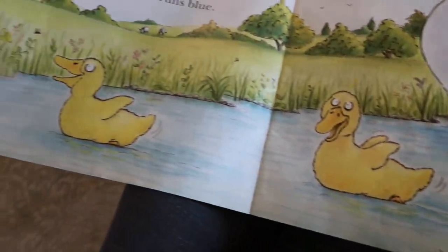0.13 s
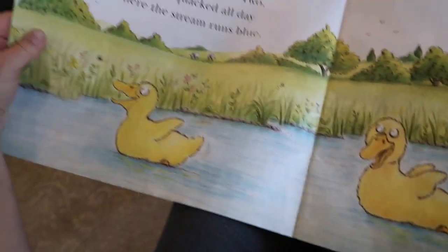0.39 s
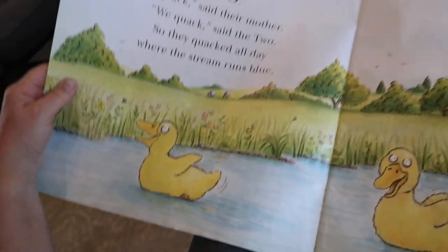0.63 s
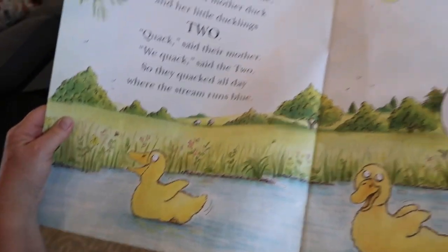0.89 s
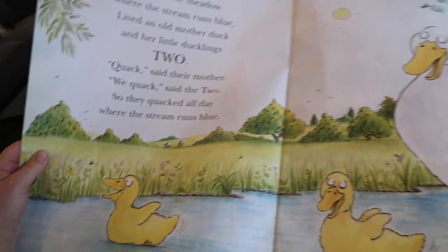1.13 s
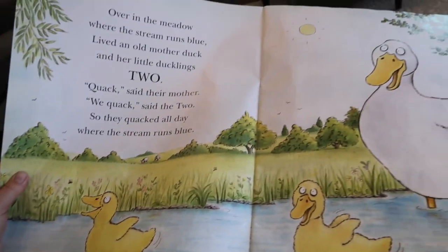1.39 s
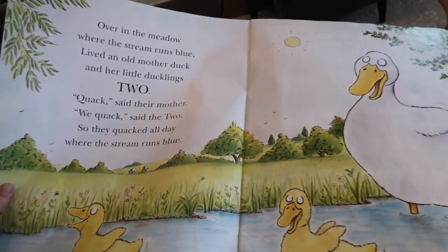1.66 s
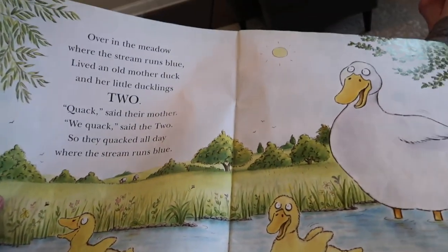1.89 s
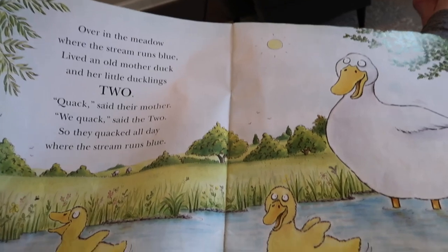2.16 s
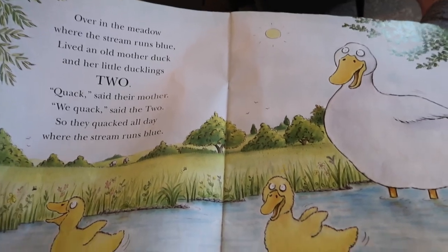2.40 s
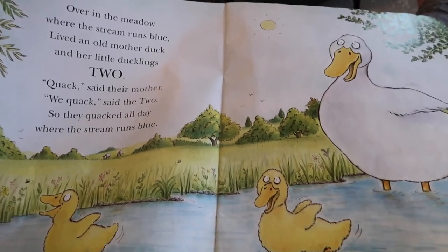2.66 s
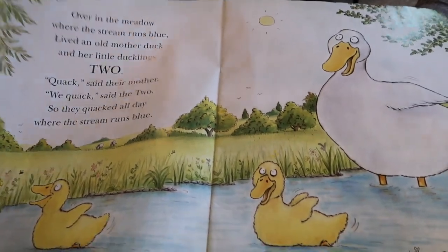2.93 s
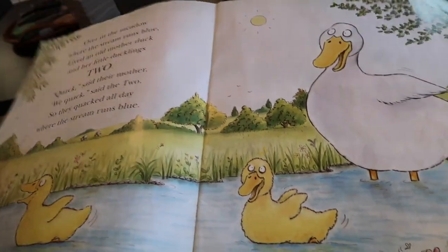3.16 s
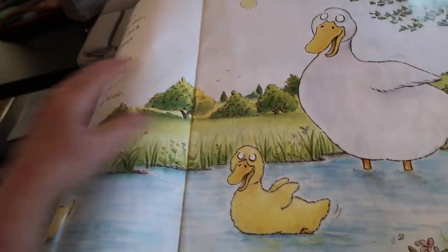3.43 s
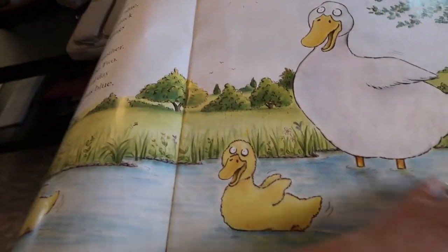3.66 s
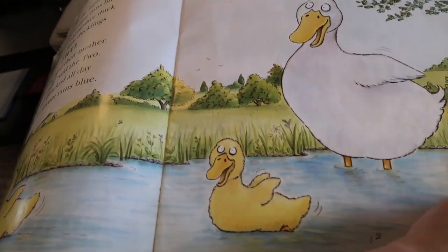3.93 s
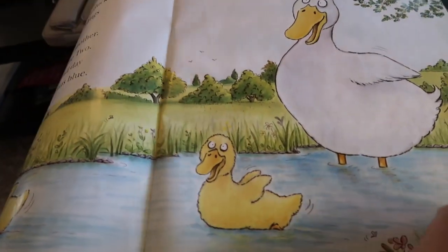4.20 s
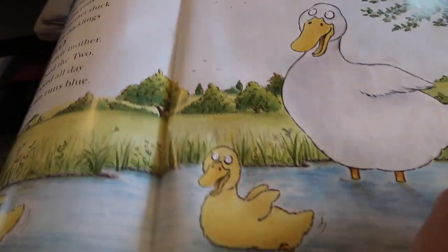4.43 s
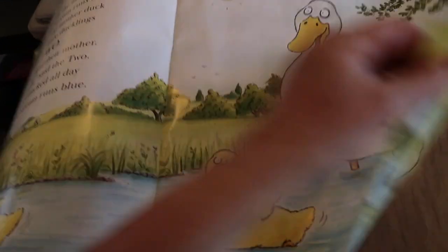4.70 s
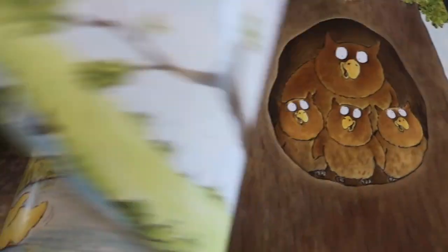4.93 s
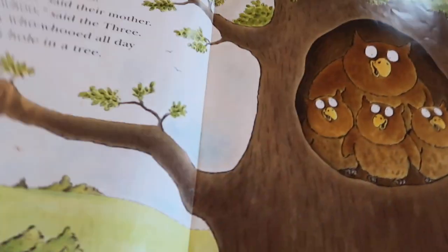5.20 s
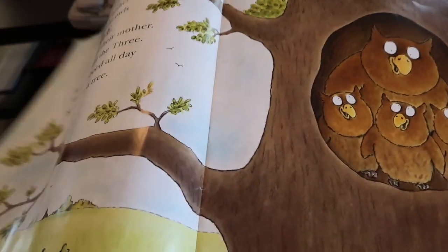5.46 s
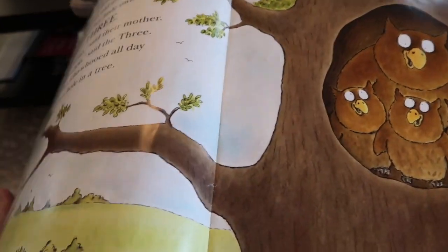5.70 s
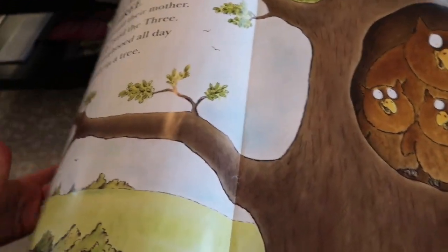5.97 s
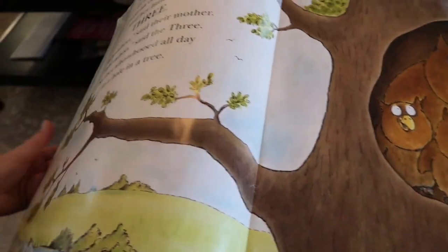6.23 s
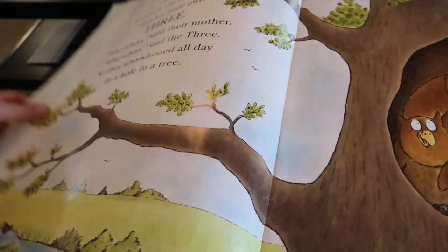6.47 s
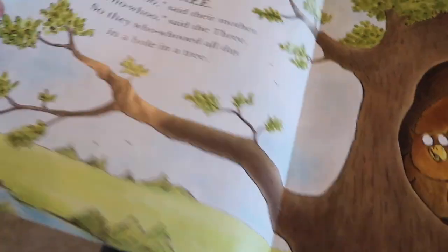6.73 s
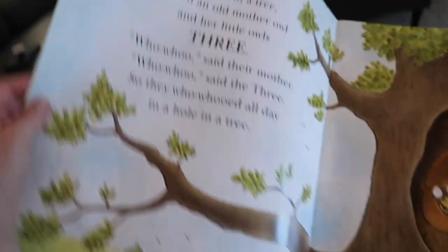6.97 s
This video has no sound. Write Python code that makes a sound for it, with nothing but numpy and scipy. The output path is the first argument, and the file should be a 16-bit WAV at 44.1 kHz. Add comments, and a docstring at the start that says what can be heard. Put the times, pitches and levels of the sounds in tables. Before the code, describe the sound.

Close to the microphone, a large glossy book shifts with a brief crackle and soft thump, then rests in a quiet rumbling room. A distant bird chirps faintly. The sheet buckles with a hollow pop, fingers slide and scrape along it, and the page turns in a burst of flapping and snapping. After a lull, light handling and a low thud close the scene.

```python
"""A large glossy picture book on a lap, close to a camera in a quiet room, while one page is turned.
From the start there is a rumble, hiss and a thin whistle (shaped noise, a sine), with focus-motor pings.
From about 0.15 s the sheet flaps and scrapes (swept noise) under sliding skin, snaps (ringing modes),
and the book thumps softly (fading sines). A far bird warbles (gliding sines) from 1.7 s; the book is
handled again at about 2.9 s, 3.7 to 5.9 s and from 6.6 s to the end."""
import sys
import numpy as np
from scipy import signal
from scipy.fft import rfft, irfft, next_fast_len
from scipy.io import wavfile
from scipy.ndimage import uniform_filter1d, map_coordinates

SR = 44100
rng = np.random.default_rng(int(sys.argv[2]) if len(sys.argv) > 2 else 0)


def volts_from_decibels(level):
    """Turn decibel levels (scalar or array-like) into linear amplitude factors."""
    exponent = np.asarray(level, float) / 20
    return 10 ** exponent


def digitize_waveform(pressure):
    """Quantize a signal to 16-bit integers and store it at the path in sys.argv[1].

    Rows of a 2-D input are taken as channels; values are limited to [-1, 1].
    """
    field = np.atleast_2d(pressure).T
    bounded = np.clip(field, -1, 1)
    quanta = np.round(bounded * 32767).astype(np.int16)
    wavfile.write(sys.argv[1], SR, quanta)


N = 313286

# the sheet buckles or is tapped; levels are those of the loudest millisecond:
# [start_s, body_db, body_pitch_hz, crack_db, tick_db]
BUCKLES = [(0.219, -63, 248, -49, -56), (0.2258, -36, 250, -46, -50), (0.246, -35, 272, -39.5, -51),
           (0.272, -45, 262, -41, -46), (0.2755, -27.5, 260, -24.5, -42), (0.287, -41, 250, -42, -62),
           (0.298, -36, 300, -55, -60), (0.3322, -31, 263, -31.5, -47), (2.866, -36, 395, -42, -59),
           (2.964, -36, 433, -43, -54), (2.973, -57, 430, -40.5, -45), (2.98, -41, 241, -42, -56),
           (3.031, -23, 533, -29, -43), (3.035, -16.5, 324, -37, -60), (3.0385, -13, 301, -29, -68),
           (3.045, -24.5, 564, -37, -46), (3.071, -42, 450, -40, -61), (3.095, -32, 790, -52, -62),
           (3.198, -45, 257, -52, -50), (3.219, -44, 815, -55, -52), (3.277, -47, 290, -48, -46),
           (3.75, -40, 450, -70, -54), (4.142, -41.5, 566, -66, -54), (4.199, -54, 510, -49, -54),
           (4.232, -31, 330, -40, -48), (4.289, -33.5, 417, -52, -53), (4.305, -54, 840, -25.5, -54),
           (4.3075, -32, 850, -32, -52), (4.391, -39, 910, -37, -57), (4.4537, -28.5, 515, -18.5, -32),
           (4.469, -38, 253, -42, -42), (4.479, -38, 854, -26.5, -38), (4.492, -41, 730, -33, -51),
           (4.519, -32, 504, -35, -42), (4.547, -39, 505, -42, -54), (4.567, -55, 400, -37, -53),
           (4.583, -57, 999, -35, -51), (4.607, -52, 617, -24, -40), (4.951, -36, 407, -52, -64),
           (4.994, -28, 484, -29.5, -46), (4.998, -26, 593, -35, -50), (5.01, -49, 500, -51, -49),
           (5.034, -19.5, 423, -25, -59), (5.037, -21, 500, -30, -54), (5.042, -28, 423, -40, -60),
           (5.054, -23.5, 393, -33, -53), (5.064, -35, 520, -50, -58), (5.073, -28, 424, -50, -54),
           (5.088, -32, 445, -50, -60), (5.102, -29, 540, -50, -58), (5.119, -25.5, 605, -19.5, -39.5),
           (5.131, -23.5, 910, -47, -57), (5.14, -27, 580, -52, -62), (5.148, -43, 403, -53, -63),
           (5.173, -24.5, 890, -35, -55), (5.184, -35, 690, -46, -64), (5.25, -34.5, 550, -54, -62),
           (5.266, -30.5, 704, -52, -56), (5.439, -27.5, 284, -26, -32), (5.447, -28.5, 330, -32.5, -59),
           (5.455, -32, 600, -38, -50), (5.463, -31, 686, -40, -54), (5.473, -39, 500, -52, -56),
           (5.4995, -30.5, 1050, -27, -42), (5.507, -34, 635, -47, -60), (6.667, -42, 710, -62, -60),
           (6.72, -47, 715, -64, -57), (6.857, -40, 540, -59, -60), (6.8625, -30.5, 380, -49, -51),
           (6.869, -39, 560, -47, -54), (6.877, -23.5, 283, -54, -58), (6.896, -37, 300, -65, -64),
           (6.9655, -35.5, 795, -42, -62), (6.987, -40.5, 593, -50, -61), (6.997, -47, 560, -60, -64),
           (7.006, -38.5, 690, -56, -63), (7.019, -47, 690, -49, -59), (7.029, -44, 700, -57, -63),
           (7.038, -46, 700, -56, -63), (7.072, -43, 560, -58, -57), (7.081, -45, 545, -64, -64),
           (7.091, -40, 557, -58, -64)]


def unit(x):
    """Scale to an average (rms) level of 1."""
    return x / np.sqrt(np.mean(x ** 2) + 1e-20)


def along(points, hz):
    """Read a curve of (Hz, value) points on a logarithmic pitch axis."""
    f, v = np.transpose(points)
    return np.interp(np.log(hz + 1), np.log(f + 1), v)


def curve(rows):
    """Turn (seconds, value) points into one value per sample."""
    return np.interp(np.arange(N) / SR, *np.transpose(rows))


def filtered(x, response):
    """Multiply the spectrum of x by a response that depends on frequency."""
    m = next_fast_len(x.shape[-1] + 8192)
    hz = np.fft.rfftfreq(m, 1 / SR)
    return irfft(rfft(x, m) * response(hz), m)[..., :x.shape[-1]]


def coloured(x, spectrum):
    """Shape x by a spectrum that falls silent beyond its ends, at rms 1."""
    below, above = (spectrum[0][0] / 2, -120), (spectrum[-1][0] * 2, -120)
    closed = [below] + list(spectrum) + [above]
    return unit(filtered(x, lambda hz: volts_from_decibels(along(closed, hz))))


def wobble(rate):
    """A smooth random curve with `rate` random points a second."""
    points = rng.standard_normal(int(N * rate / SR) + 4)
    return map_coordinates(points, [np.arange(N) * rate / SR])


def mode(f, hz, width):
    """Response of one resonance: strongest at hz, about `width` hertz wide."""
    return 1j * f * width / (hz * hz - f * f + 1j * f * width)


def swept(x, spectrum, hz, width, skirt_db):
    """Colour x and pass it through a resonance that follows hz; width is a share of that pitch."""
    f, t, z = signal.stft(x, SR, nperseg=512, noverlap=384)
    at = np.minimum((t * SR).astype(int), N - 1)
    centre = hz[at]
    gain = np.abs(mode(f[:, None], centre, width[at] * centre)) ** 2 + volts_from_decibels(skirt_db)
    # the level stays as the colour moves
    heard = gain * volts_from_decibels(along(spectrum, f))[:, None]
    gain /= np.sqrt(np.mean(heard ** 2, 0))
    moving = signal.istft(z * gain, SR, nperseg=512, noverlap=384)[1][:N]
    return coloured(moving, spectrum)


def panned(x, db, lag_us):
    """Mono to stereo: treble is shaded from port to port, and one port hears the sound first."""
    high = filtered(x, lambda f: f ** 2 / (f ** 2 + 1000 ** 2))
    pair = x - high + high * volts_from_decibels([db / 2, -db / 2])
    at = np.arange(N)
    half_lag = lag_us * 1e-6 * SR / 2  # in samples
    left = map_coordinates(pair[0], [at - half_lag], order=5)
    right = map_coordinates(pair[1], [at + half_lag], order=5)
    return np.array([left, right])


def tail(t60s):
    """Two noise echoes in which each frequency dies at its own speed; the first has energy 1."""
    hz, t, z = signal.stft(rng.standard_normal((2, SR // 2)), SR, nperseg=256)
    fade = volts_from_decibels(-60 * t / along(t60s, hz)[:, None])
    h = signal.istft(z * fade, SR, nperseg=256)[1]
    return h / np.linalg.norm(h[0])


def air():
    """Ventilation rumble partly shared by both ports, hiss less alike in them, and a steady thin whistle."""
    # colour of rumble and hiss: [pitch_hz, relative_db per hertz]
    noise_colour = [(12, -66), (20, -27), (49, -8), (90, -8.5), (153, -1.5), (180, -7), (259, -8),
                    (382, -14), (478, -14), (549, -17.5), (597, -16.5), (857, -20.5), (1870, -24),
                    (12700, -43), (15500, -28)]
    # how alike left and right are: [pitch_hz, likeness from -1 to 1]
    likeness = [(60, 1), (180, 0.87), (550, -0.13), (1650, 0.11), (4970, 0.38), (15000, -0.51)]
    # electronic whistle: pitch_hz, level_db (rms), left_lead_radians
    whistle_hz, whistle_db, left_lead = (13007, -84.3, 1.2)
    level_db = -49.5 + .4 * wobble(3)

    def shape(hz):
        return volts_from_decibels(along(noise_colour, hz)) / (1 + (hz / 13250) ** 120)  # hiss ends steeply

    def mid_and_side(hz):
        turn = np.arccos(np.clip(along(likeness, hz), -1, 1)) / 2
        return shape(hz) * np.array([np.cos(turn), np.sin(turn)])

    mid, side = filtered(rng.standard_normal((2, N)), mid_and_side)
    phase = 2 * np.pi * whistle_hz * np.arange(N) / SR + [[left_lead], [0]]
    whistle = np.sqrt(2) * volts_from_decibels(whistle_db) * np.sin(phase)
    return volts_from_decibels(level_db) * unit(np.array([mid + side, mid - side])) + whistle


def focus():
    """Each motor step pings the camera body and rebounds, pushing the two ports in opposite directions."""
    # the focus motor hunts: [start_s, end_s, steps_per_s, level_db before spread and port gains]
    runs = [(.015, .16, 29.97, -51), (.615, 1.06, 29.97, -55), (5.02, 5.6, 14.985, -55),
            (5.62, 6.1, 14.985, -52), (6.154, 6.43, 14.985, -58)]
    spread_db, rebound_db, rebound_s = 4, -2, .018
    out, t = np.zeros(N + SR), np.arange(SR // 80) / SR
    swell = np.exp(-.5 * ((t - .003) / .0016) ** 2)
    for start, end, rate, db in runs:
        for s in np.arange(start, end, 1 / rate):
            size, again, late = rng.standard_normal(size=3)
            step = (s, size * spread_db / 2)
            rebound = (s + rebound_s * np.exp(.4 * late), rebound_db + again * spread_db)
            for at, level in (step, rebound):
                ping = np.sin(2 * np.pi * rng.normal(4070, 30) * t)
                ping += 0.33 * np.sin(2 * np.pi * 3350 * t)
                out[round(at * SR):][:len(t)] += volts_from_decibels(db + level) * ping * swell
    return out[:N] * [[1.15], [-.85]]


def handling():
    """Flap and scrape levels follow the gestures and each snap; the slide swells with each stroke."""
    # the sheet in motion, one table a gesture, levels before flicker: [time_s, flap_db, scrape_db]
    gestures = [
        [(.15, -56, -66), (.2, -72, -63), (.227, -50, -48), (.24, -63, -69), (.294, -55, -56), (.4, -60, -59),
         (.55, -77, -90)],
        [(2.9, -74, -83), (2.992, -50, -60), (3.058, -46, -49), (3.124, -46.5, -49), (3.16, -47.5, -57),
         (3.21, -51.5, -53), (3.296, -57.5, -63), (3.45, -63, -69)],
        [(3.7, -77, -83), (3.79, -54.5, -83), (3.9, -79, -83)],
        [(4.1, -53, -68), (4.15, -54, -66), (4.21, -58, -55), (4.28, -51, -63), (4.312, -50, -42.5),
         (4.34, -48.5, -43.5), (4.35, -50, -48), (4.385, -54, -50), (4.405, -55, -47), (4.42, -55, -37.5),
         (4.44, -55, -37.5), (4.452, -48, -39), (4.47, -37.5, -50), (4.525, -45.5, -49), (4.58, -49, -57),
         (4.64, -46.5, -47.5), (4.706, -54.5, -61), (4.8, -52.5, -67)],
        [(4.8, -56, -66), (4.93, -51.5, -61), (4.985, -38.5, -55), (5.02, -36, -50), (5.06, -40.5, -46),
         (5.11, -35.5, -50), (5.14, -32, -48), (5.21, -38, -58), (5.266, -38.5, -62), (5.43, -51.5, -66)],
        [(5.43, -48, -54), (5.465, -40, -40), (5.49, -42, -50), (5.51, -37.5, -43.5), (5.55, -53, -49.5),
         (5.6, -53, -55.5), (5.738, -66, -58.5), (5.9, -71, -78)],
        [(6.6, -68, -70), (6.66, -59, -69), (6.705, -48.5, -63), (6.77, -58, -82), (6.85, -55.5, -74),
         (6.94, -52.5, -73), (6.99, -43, -58), (7.03, -45, -71), (7.05, -56, -67), (7.09, -47, -54)],
    ]
    # skin slides over the gloss: [middle_s, length_s, level_db before flicker]
    strokes = [(0.214, 0.17, -65), (3.03, 0.29, -58.5), (3.232, 0.24, -53.5), (3.82, 0.32, -66.5),
               (4.273, 0.26, -55.5), (4.5, 0.5, -52.5), (4.87, 0.47, -64.5), (4.984, 0.12, -69),
               (5.1, 0.11, -51), (5.438, 0.27, -68), (5.646, 0.44, -63.5), (6.65, 0.44, -60),
               (7.03, 0.73, -56)]
    shudder_db, shudder_t60_s = -18.5, 0.065  # level under the snap, and decay
    rest_hz, rest_db, hz_per_db = 330, -69, 4.5
    t = np.arange(N) / SR
    levels = np.zeros((3, N))  # flap, scrape, slide
    for rows in gestures:
        s, *dbs = np.transpose(rows)
        # silent outside its gesture, but the last one stays on to the end
        fade = np.clip(np.minimum(t - s[0], s[-1] - t) / .03 + .5 + (t > 7), 0, 1)
        levels[:2] += fade * volts_from_decibels([np.interp(t, s, d) for d in dbs])
    # after a snap the sheet flaps and scrapes on
    after = t[:SR // 3]
    shudder = volts_from_decibels(shudder_db - 60 * after / shudder_t60_s) * (1 - np.exp(-after / 0.00035))
    for s, db, _, crack_db, _ in BUCKLES:
        part = levels[:2, round(s * SR):][:, :len(after)]
        part += volts_from_decibels([[db], [crack_db]]) * shudder[:part.shape[1]]
    for s, length, db in strokes:
        levels[2] += volts_from_decibels(db) * np.cos(np.pi * np.clip((t - s) / length, -.5, .5)) ** 2
    # a harder flap stretches the sheet and rings higher
    effort_db = 20 * np.log10(levels[0] + 1e-6) - rest_db
    return levels, rest_hz + hz_per_db * np.clip(effort_db, 0, 18)


def crinkle(rate, share):
    """Friction: smooth noise plus clumped tiny slips of uneven size."""
    slips = (rng.random(N) < rate / SR * volts_from_decibels(3 * wobble(60))) * rng.standard_normal(N)
    share = np.clip(share, 0, 1)
    return np.sqrt(share) * unit(slips) + np.sqrt(1 - share) * rng.standard_normal(N)


def rustle(bend_hz, bend_width):
    """The sheet wobbles in the air, its edge scrapes, and skin slides on the gloss."""
    # three noise colours: [pitch_hz, relative_db per hertz]
    flap_colour = [(100, 11), (200, 2.5), (300, -6), (500, -6.5), (800, -5), (1300, -3), (2500, -8)]
    scrape_colour = [(400, -43), (900, 5), (1500, -1), (2200, 0.5), (3500, -5), (4300, -8), (5200, -24),
                     (8000, -35)]
    slide_colour = [(1500, 0.5), (3500, 2), (5000, -2.5), (8000, -9.5), (12000, -11), (14500, -19)]
    levels, flap_hz = handling()
    flap = swept(crinkle(250, share=0.29), flap_colour, flap_hz, width=np.full(N, 0.99), skirt_db=-22.5)
    flap *= volts_from_decibels(1.8 * wobble(60))
    scrape_hz = bend_hz * (1 + 0.054 * wobble(50))
    scrape = swept(crinkle(2600, share=0.66), scrape_colour, scrape_hz, width=bend_width, skirt_db=-11)
    scrape *= volts_from_decibels(1.6 * wobble(120))
    slide = coloured(crinkle(2500, share=0.3), slide_colour) * volts_from_decibels(3.0 * wobble(60))
    return levels[0] * flap + levels[1] * scrape + levels[2] * slide


def room(x):
    """The room answers after 250 samples, with a new tail each quarter second, partly alike in both ports."""
    # how long echoes take to fade by 60 dB: [pitch_hz, fade_s]
    fade_times = [(100, 0.41), (500, 0.47), (2000, 0.65), (8000, 0.34)]
    out, step = np.zeros((2, N + SR)), SR // 4
    for k in range(0, N, step):
        common, own = tail(fade_times)
        echoes = [common + 0.035 * own, common - 0.057 * own]
        wet = signal.fftconvolve(x[None, k:k + step], echoes, axes=1)
        out[:, k + 250:k + 250 + wet.shape[1]] += wet
    return out[:, :N]


def snaps(bend_hz):
    """Each buckle creeps, then lets go: the sheet's low modes ring, the fold cracks and ticks."""
    # resonances of the sheet: [pitch_hz, width_hz, relative_db]
    sheet_modes = [(250, 360, 12), (383, 325, 5.5), (565, 147, 8), (790, 250, 9.5), (1050, 390, 7.5),
                   (1540, 310, 6.5), (2170, 260, 7), (2410, 790, 1), (3040, 690, -3), (4270, 820, -22)]
    grit_level, crack_t60_s = .08, .011  # tearing noise beside a release of 1; crack decay
    out, t = np.zeros(N + SR), np.arange(SR // 5) / SR
    go = round(.0012 * SR)  # the release follows 1.2 ms of creeping

    def peak(x):
        """Scale the loudest millisecond to 1."""
        return x / np.sqrt(uniform_filter1d(x ** 2, size=44).max())

    def sheet(f, hz, steep):
        """Modes of alternating sign, weaker the further they lie from hz."""
        total = 0
        for k, (centre, width, db) in enumerate(sheet_modes):
            level = volts_from_decibels(db - steep * np.log2(centre / hz) ** 2)
            total = total + (-1) ** k * level * mode(f, centre, width)
        return total

    for s, db, hz, crack_db, tick_db in BUCKLES:
        crack_hz = bend_hz[round(s * SR)]
        grit = grit_level * rng.standard_normal(len(t))
        grit[go] = 1

        def dying(t60):
            return grit * volts_from_decibels(-60 * np.maximum(t - t[go], 0) / t60)

        def body_response(f):
            ring = 0.24 * mode(f, hz, 2.0 * hz) + mode(f, hz, 0.21 * hz)
            return sheet(f, hz, 17.0) * ring / (1 + 1j * f / (2.27 * hz)) ** 2

        def crack_response(f):
            return sheet(f, crack_hz, 8) * mode(f, crack_hz, 0.75 * crack_hz)

        body = filtered(dying(5 / hz), body_response)
        crack = filtered(dying(crack_t60_s), crack_response)
        tick = filtered(dying(0.024), lambda f: mode(f, 3320, 3300) ** 2 + 0.11 * mode(f, 8900, 7700))
        snap = volts_from_decibels(db) * peak(body) + volts_from_decibels(crack_db) * peak(crack) + volts_from_decibels(tick_db) * peak(tick)
        out[round(s * SR):][:len(t)] += snap
    return out[:N]


def thumps():
    """The heavy book shifts on the lap: a soft low push of air that rocks unevenly and fades."""
    # [start_s, level_db before the soft onset, pitch_hz, time to fade by 60 dB in s]
    shifts = [(0.223, -34, 150, 0.048), (0.2763, -16.5, 192, 0.041), (0.331, -29.5, 95, 0.074),
              (3.032, -29, 131, 0.18), (3.749, -27, 93, 0.1), (4.474, -31, 82.5, 0.043),
              (4.517, -27, 74, 0.06), (5.001, -43, 151, 0.15), (5.034, -24.5, 104, 0.15),
              (5.119, -27, 62, 0.17), (5.44, -32, 132, 0.2), (6.862, -20, 127, 0.094)]
    out, t = np.zeros(N + SR), np.arange(SR // 3) / SR
    for s, db, hz, t60 in shifts:
        rock = np.sin(2 * np.pi * hz * t)
        rock += .4 * np.sin(2 * np.pi * hz * rng.uniform(.55, .7) * t)
        onset = 1 - np.exp(-t / 0.0017)
        out[round(s * SR):][:len(t)] += volts_from_decibels(db - 60 * t / max(t60, .02)) * rock * onset
    return filtered(out[:N], lambda f: (1j * f / (25 + 1j * f)) ** 2)


def nails():
    """A fingernail catches the page edge: a thin bright tick, made of a short swell of hiss."""
    # [start_s, level_db before the bass is cut]
    catches = [(.2745, -53), (.332, -53), (3.198, -50), (3.272, -41.5), (5.118, -61), (5.438, -52)]
    cut_hz, length_s = 4800, 0.0098
    out, swell = np.zeros(N), np.hanning(round(length_s * SR))
    for s, db in catches:
        out[round(s * SR):][:len(swell)] += volts_from_decibels(db) * swell * rng.standard_normal(len(swell))
    return filtered(out, lambda f: (1j * f / (cut_hz + 1j * f)) ** 3)


def bird():
    """Each far chirp warbles in falling strokes with quick climbs between, faint among smeared echoes."""
    # pitches are the middle of the warble, level is before flicker and echo:
    # [start_s, length_s, first_pitch_hz, last_pitch_hz, level_db]
    chirps = [(1.721, 0.1, 3330, 3330, -56.5), (1.914, 0.11, 3665, 3570, -52.5),
              (2.603, 0.13, 3400, 3350, -58), (2.772, 0.11, 3764, 3565, -52.5),
              (3.51, 0.089, 3590, 3230, -58), (3.677, 0.13, 3930, 3350, -53.5),
              (3.895, 0.12, 3950, 3430, -53), (4.78, 0.091, 3730, 3260, -58)]
    warble_s, warble_hz, direct_db = .047, 400, -7  # period, swing each way, direct sound gain
    out, waver, flecks = np.zeros((2, N + SR)), wobble(200), wobble(70)
    for s, length, first_hz, last_hz, db in chirps:
        k = round(s * SR)
        u = np.arange(round(length * SR)) / (length * SR)  # 0 to 1 through the chirp
        stroke = (u * length / warble_s + .25) % 1
        swing = 2 * np.minimum(stroke / .25, (1 - stroke) / .75) - 1
        pitch = first_hz + (last_hz - first_hz) * u + warble_hz * swing + 130 * waver[k:k + len(u)]
        sweep = np.sin(2 * np.pi * np.cumsum(pitch) / SR)
        sweep *= volts_from_decibels(2.5 * flecks[k:k + len(u)]) * np.sin(np.pi * u) ** .4
        echo = signal.fftconvolve(sweep[None], tail([(3000, 0.55)]), axes=1)
        echo[:, :len(u)] += volts_from_decibels(direct_db) * sweep
        out[:, k:k + echo.shape[1]] += volts_from_decibels(db) * echo
    return out[:, :N]


def scene():
    """The book near the microphone, its room, and the background."""
    # the bend sets the pitch of the cracks, and the pitch and width of the scrape:
    # [time_s, pitch_hz, width as a share of pitch]
    bend = np.array([(.22, 2200, .3), (.245, 1800, .3), (.27, 1050, .3), (.325, 1050, .3), (.333, 1700, .4),
                     (.342, 1000, .4), (.5, 950, .4), (2.87, 1100, .4), (2.96, 2100, .5), (3.032, 2600, .6),
                     (3.037, 1000, .7), (3.17, 1110, .8), (3.23, 2140, .8), (4.2, 2300, .5),
                     (4.305, 1500, .5), (4.318, 3500, .4), (4.33, 3900, .35), (4.342, 3500, .4),
                     (4.355, 2500, .5), (4.41, 2050, .3), (4.44, 1900, .3), (4.456, 2000, .4),
                     (4.475, 1450, .7), (4.575, 2110, .5), (4.605, 1550, .3), (4.994, 2700, .6),
                     (5.002, 1800, .7), (5.03, 1000, .8), (5.12, 1100, .8), (5.16, 1300, .8),
                     (5.174, 3100, .6), (5.184, 1500, .8), (5.3, 1400, .8), (5.44, 1200, .7),
                     (5.5, 1150, .6), (5.53, 1900, .4), (5.59, 1950, .45), (5.64, 1600, .9),
                     (5.8, 1500, .9), (6.7, 1020, .5), (6.965, 2300, .5), (7.0, 1140, .7)])
    # where the book is handled: [time_s, side (1 = left, -1 = right)]
    side = curve([(0, 0.77), (3.4, 0.93), (3.75, -0.18), (4.5, -1.2), (4.8, -1), (5.0, 1), (5.8, 0.92),
                  (6.6, -0.32), (7.1, -1.16)])
    shade_db, lead_us = 1.5, 34  # treble of left over right, and lead of the left port, at side 1
    bend_hz, bend_width = curve(bend[:, [0, 1]]), curve(bend[:, [0, 2]])
    book = snaps(bend_hz) + rustle(bend_hz, bend_width) + nails()
    near = panned(book, shade_db * side, -lead_us * side)
    return near + thumps() + volts_from_decibels(-13.0) * room(book) + bird() + focus() + air()


def roll_off(x):
    """The treble ends steeply here."""
    return signal.sosfilt(signal.butter(12, 15640, fs=SR, output="sos"), x)


def record(dry):
    """The microphone rolls off the top of the treble."""
    mix = filtered(dry, lambda hz: 1 / (1 + (hz / 15000) ** 24))
    return roll_off(mix)


dry = scene()
out = record(dry)
digitize_waveform(out)
```